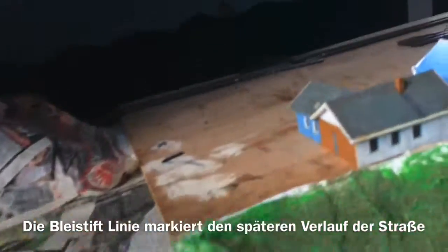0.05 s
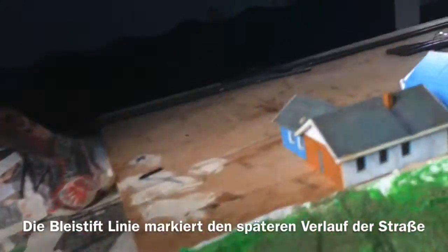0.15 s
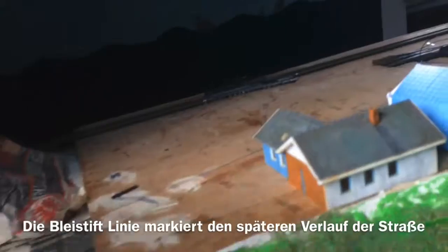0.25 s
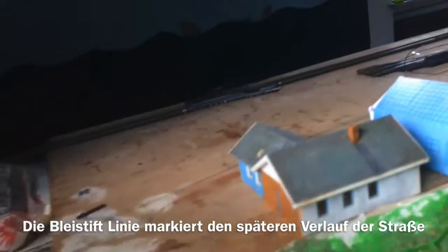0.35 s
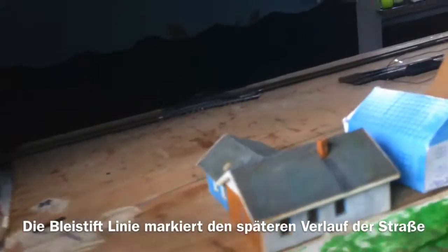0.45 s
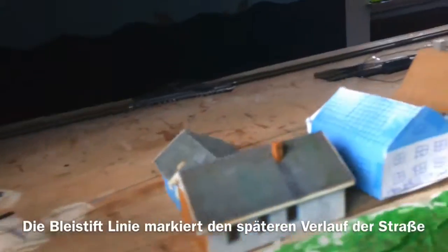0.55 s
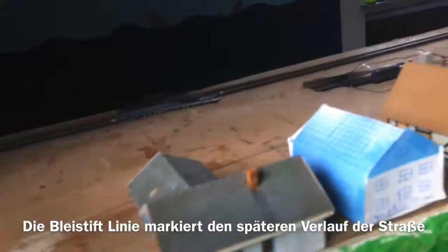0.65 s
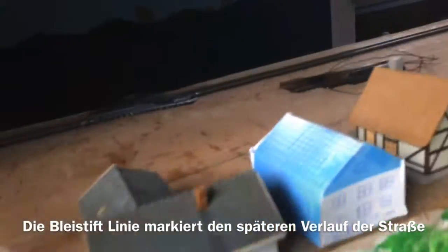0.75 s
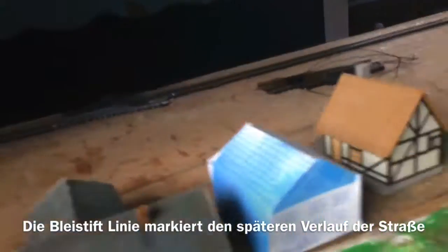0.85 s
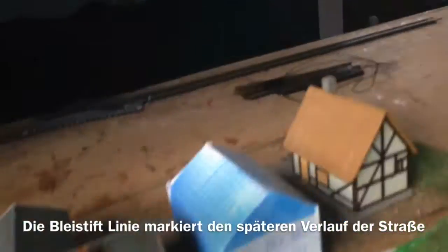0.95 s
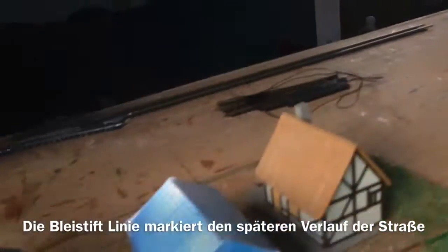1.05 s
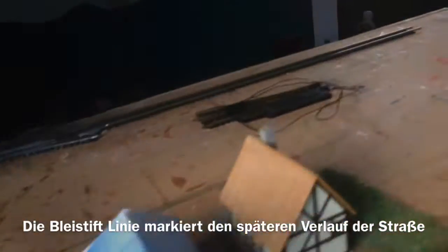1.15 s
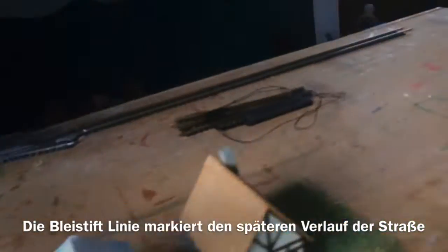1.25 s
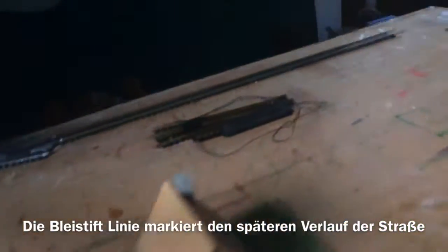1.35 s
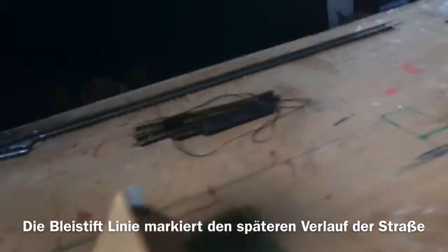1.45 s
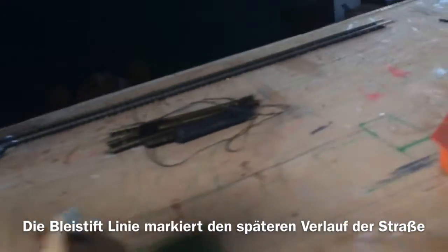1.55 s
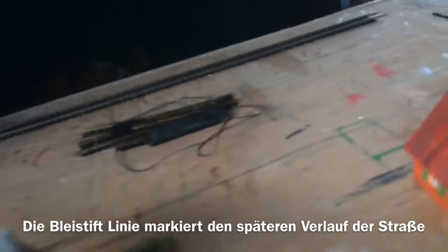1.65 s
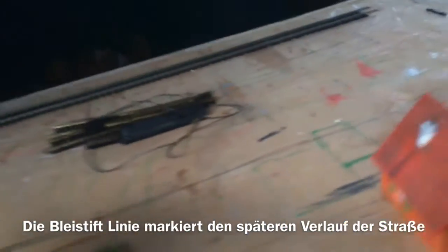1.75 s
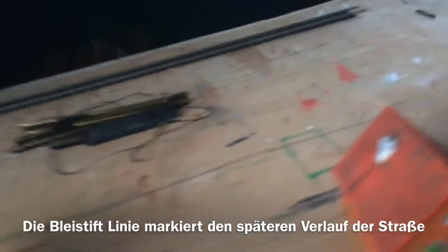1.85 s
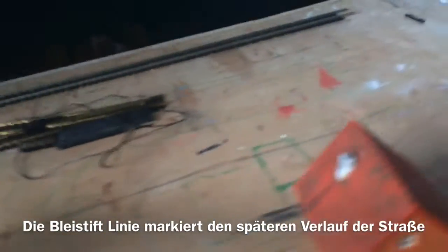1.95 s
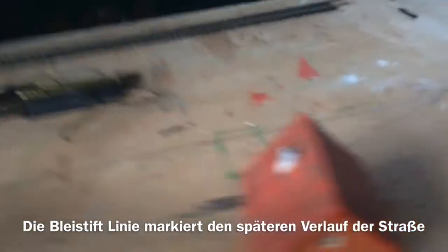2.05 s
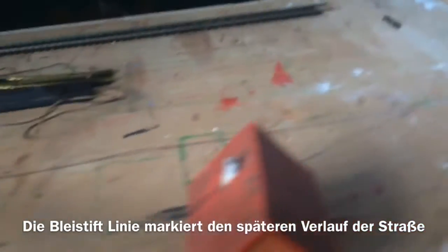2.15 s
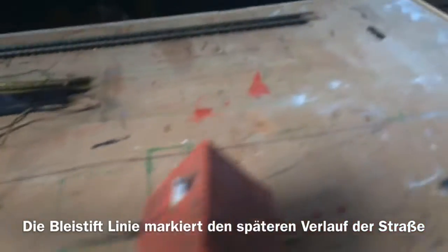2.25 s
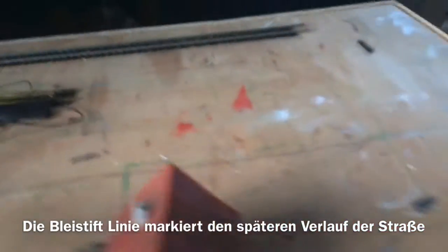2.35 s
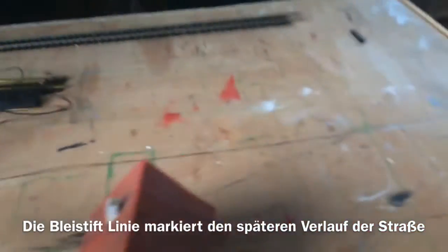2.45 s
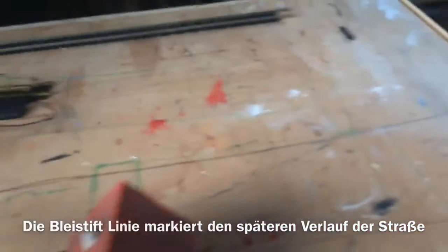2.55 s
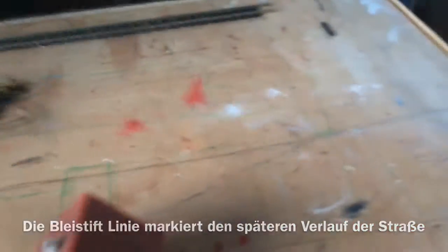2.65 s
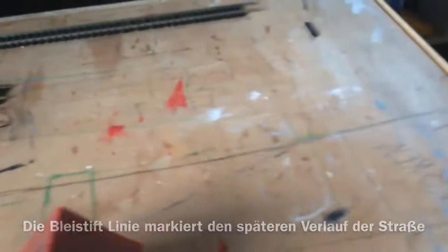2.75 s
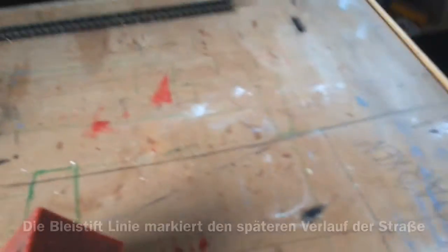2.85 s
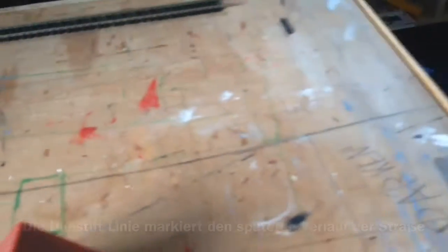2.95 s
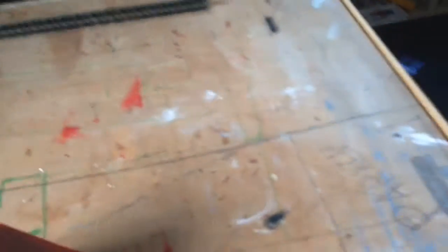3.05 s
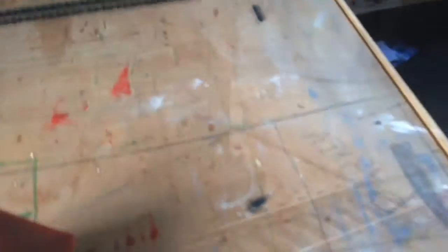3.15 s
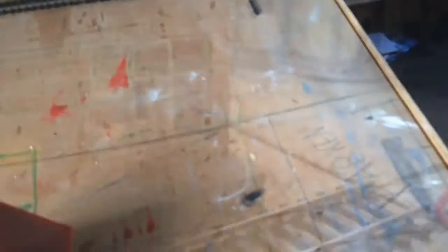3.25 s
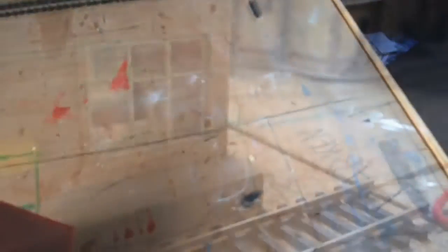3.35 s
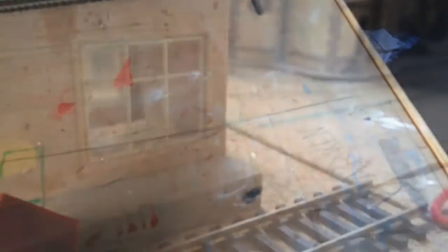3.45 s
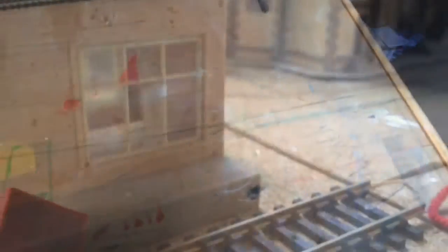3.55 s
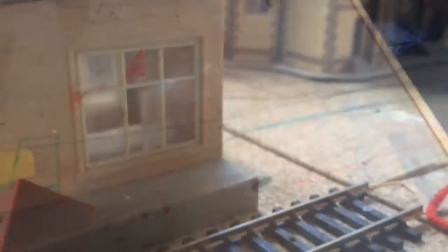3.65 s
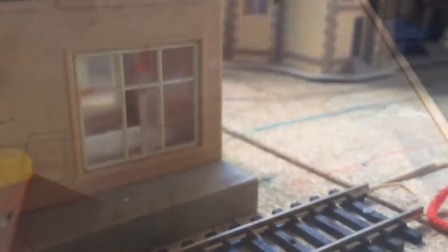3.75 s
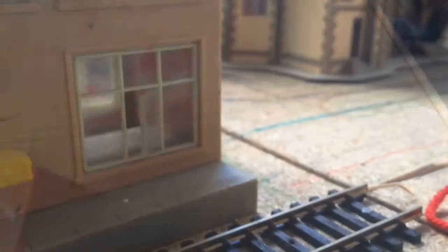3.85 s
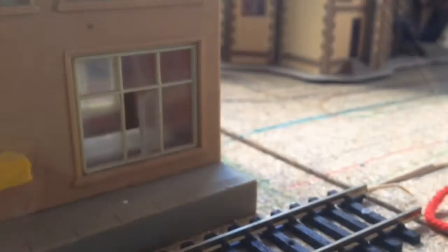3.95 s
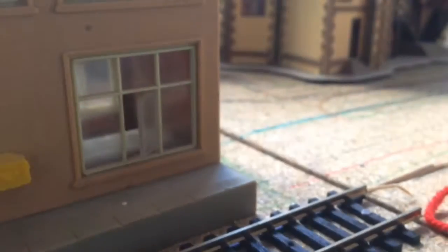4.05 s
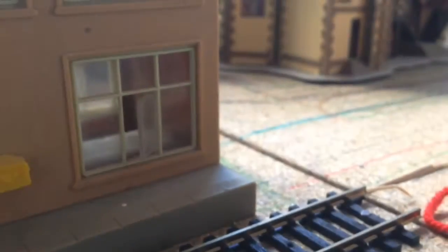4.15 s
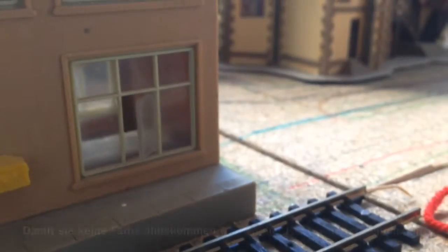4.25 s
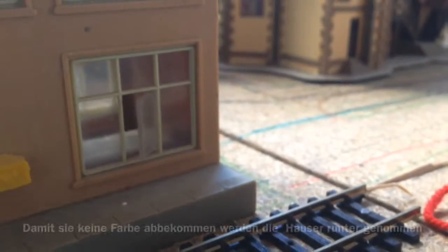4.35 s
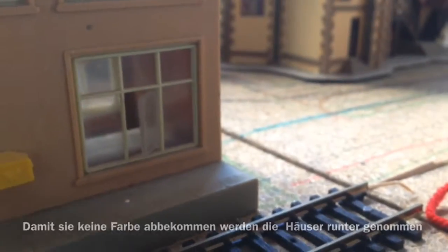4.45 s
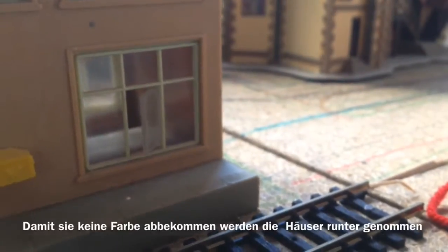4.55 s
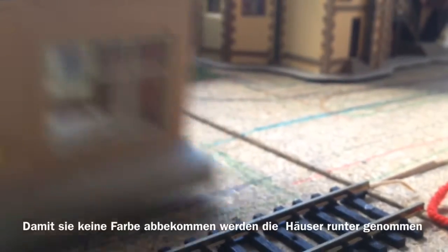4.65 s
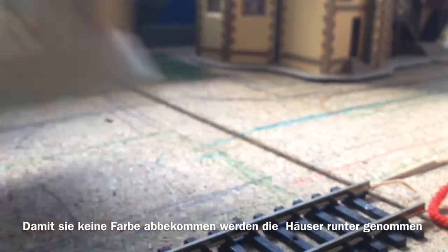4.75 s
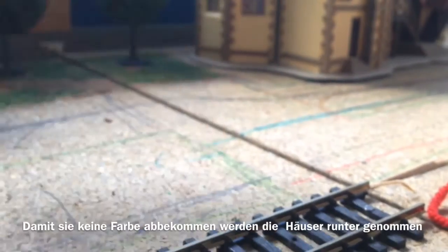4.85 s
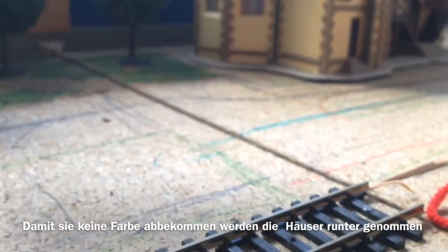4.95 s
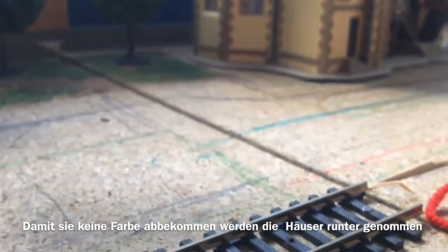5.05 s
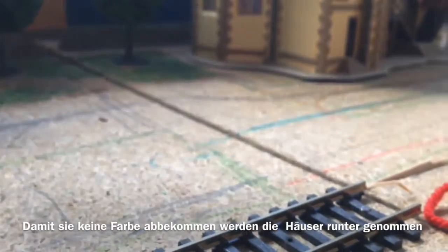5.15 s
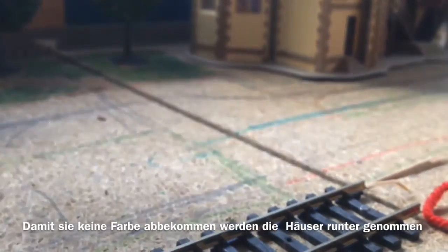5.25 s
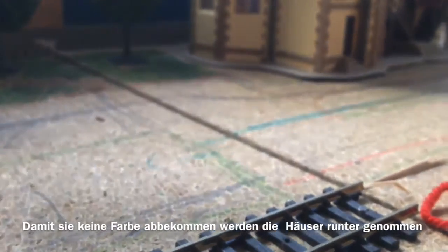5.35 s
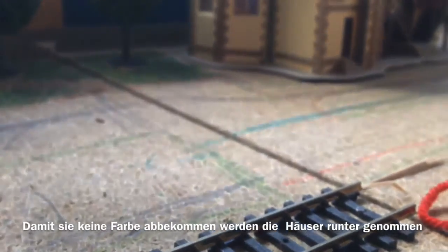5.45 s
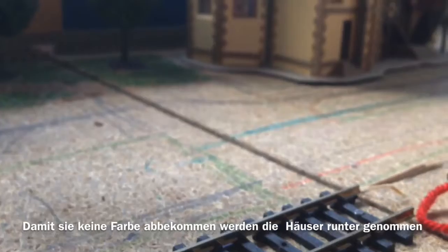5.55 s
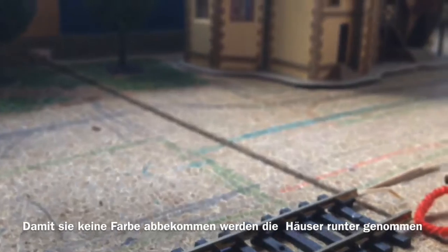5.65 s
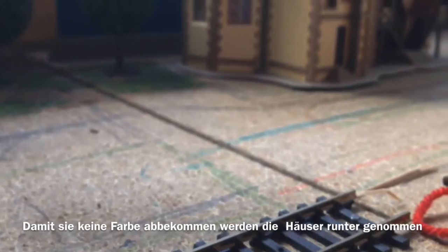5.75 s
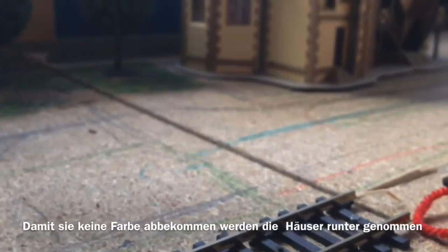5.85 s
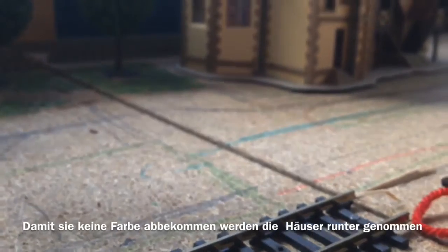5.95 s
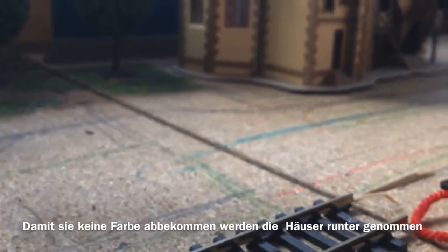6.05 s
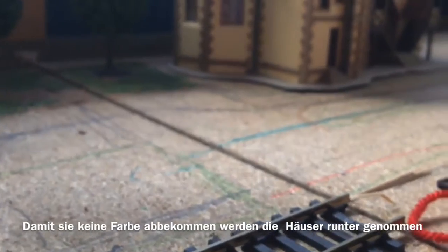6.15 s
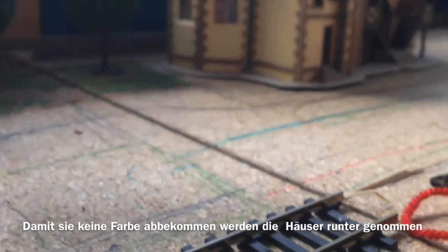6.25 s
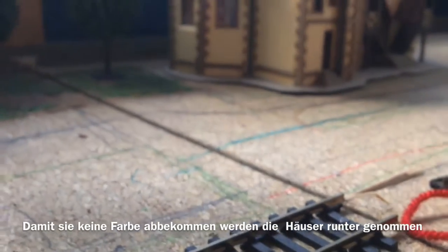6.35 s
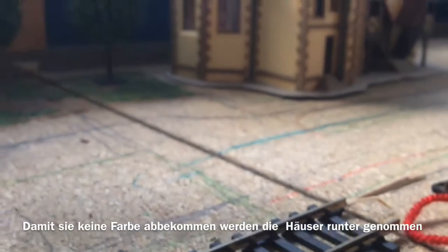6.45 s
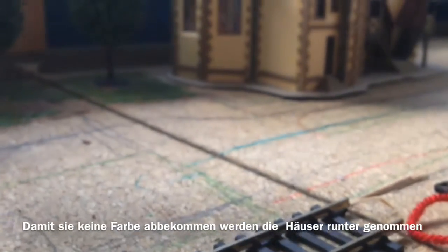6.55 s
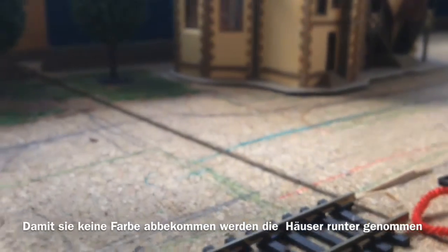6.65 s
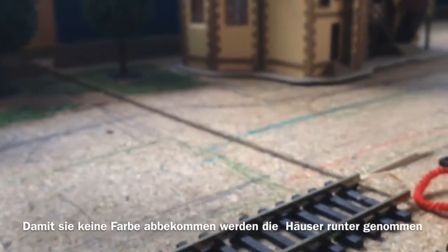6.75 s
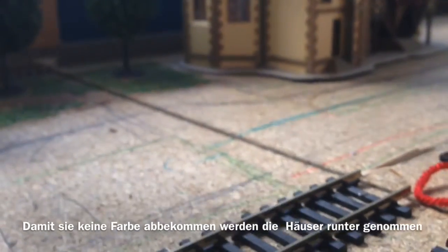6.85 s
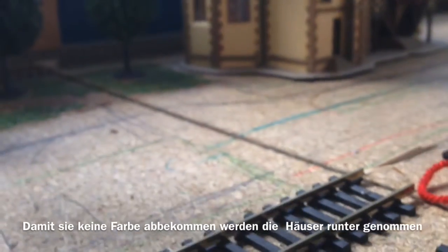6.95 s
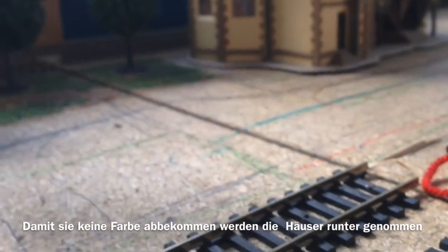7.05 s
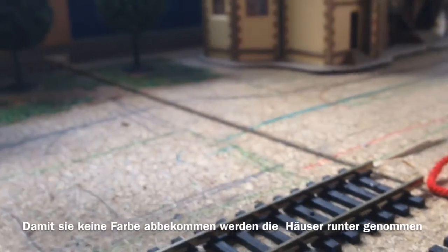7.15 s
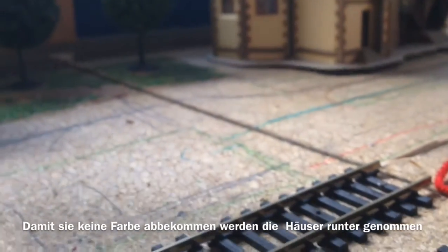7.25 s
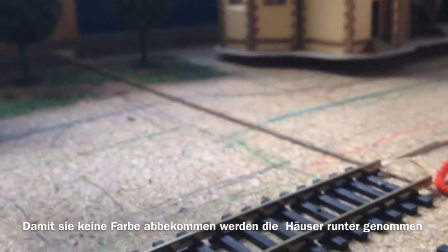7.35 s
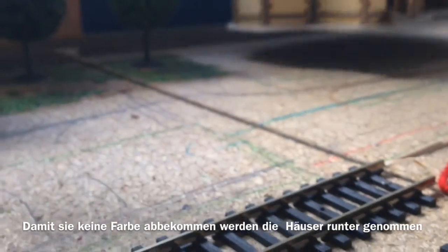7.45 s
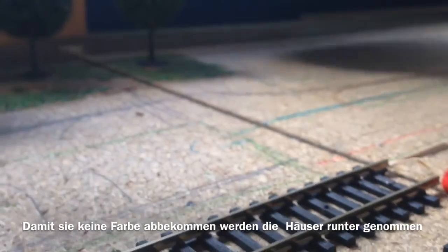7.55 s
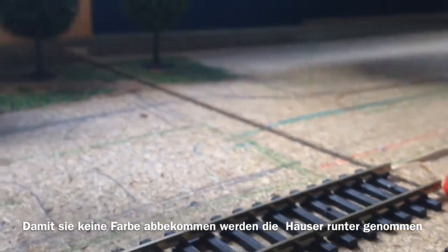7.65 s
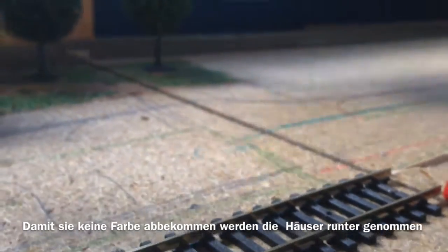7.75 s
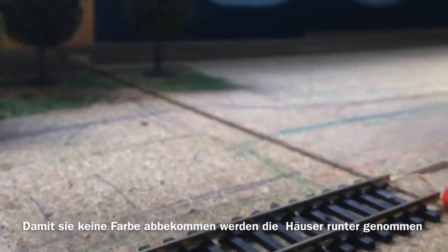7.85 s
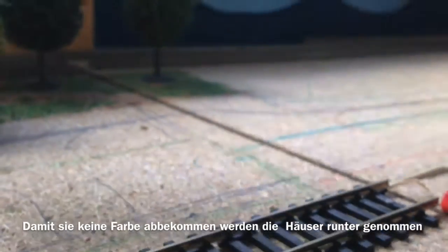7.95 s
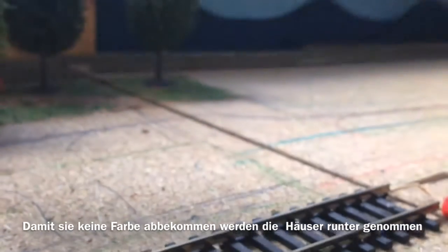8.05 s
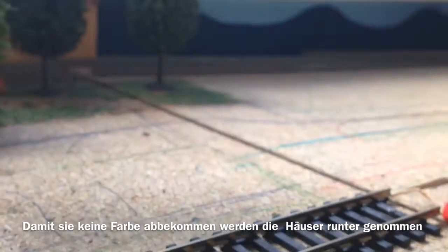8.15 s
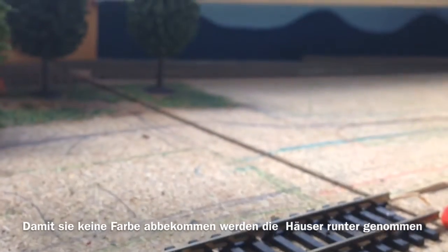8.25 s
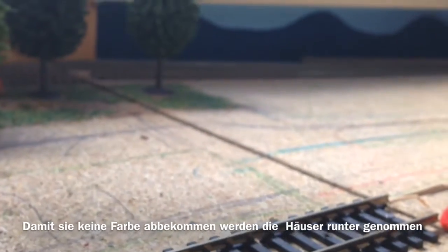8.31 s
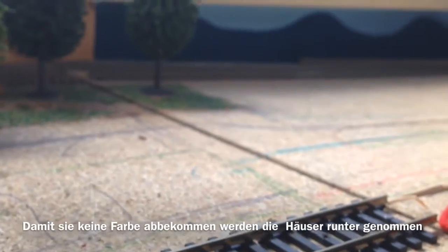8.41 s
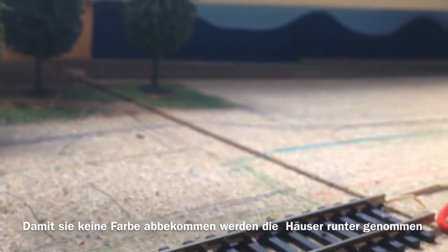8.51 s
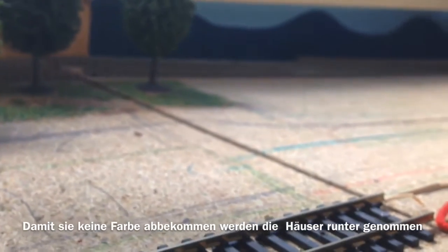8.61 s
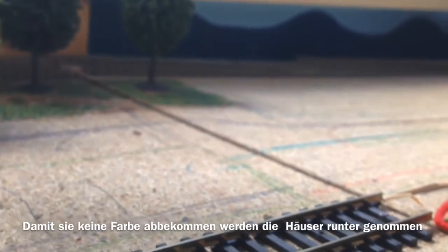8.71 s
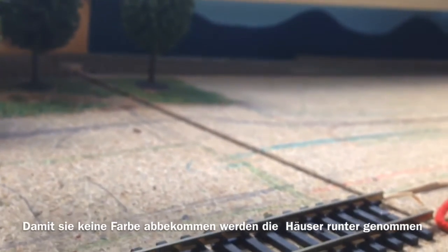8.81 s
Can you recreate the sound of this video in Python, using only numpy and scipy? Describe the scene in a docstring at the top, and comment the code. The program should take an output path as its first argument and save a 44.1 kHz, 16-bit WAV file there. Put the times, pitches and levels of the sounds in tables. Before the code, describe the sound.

Soft microphone hiss and a low hum fill a small quiet room throughout. For the first three seconds, fingers rustle faintly on a handheld camera and its plastic case creaks and ticks, most busily from 0.5 to 1.1 seconds. A thin, distant click comes at 1.4 seconds, and a small plastic part is tapped around 3.3. From 4.2 seconds a model house scrapes over cork with light knocks, building to a quick clatter near 4.8. Two sharper hollow knocks follow at 5.6 and 5.7, trailed by weaker ones. Between 6.6 and 7.5 seconds come soft, gritty drags with faint bumps, ending in a tiny, very faint squeak as a house lifts off. After a second of only hiss and hum, a house is set down hard on wood at 8.6 seconds: one sharp clack, by far the loudest sound, with a short room echo.

```python
"""Model houses on a hobby board

In a small quiet room, the plastic case of a handheld camera rustles, creaks and ticks under the fingers;
a far part clicks and a small one is tapped. Then model houses are knocked, slid over cork, lifted with a
squeak and set down hard on wood. Each blow is a rough contact that cracks and rings damped modes;
rubbing is stick-slip noise. Microphone hiss and a low room hum lie under it all."""
import sys
import numpy as np
from scipy import signal
from scipy.fft import rfft, irfft
from scipy.io import wavfile
from scipy.ndimage import uniform_filter1d

SR = 44100
rng = np.random.default_rng(int(sys.argv[2]) if len(sys.argv) > 2 else 0)


def wav_record(signal):
    """Record a signal, one row per channel, as 16-bit PCM in the file named by sys.argv[1]."""
    frames = np.transpose(np.atleast_2d(signal))
    bounded = np.clip(frames, -1, 1)
    # unit amplitude maps onto the largest positive 16-bit level
    quanta = np.round(bounded * 32767).astype(np.int16)
    wavfile.write(sys.argv[1], SR, quanta)


N = 391608

# hiss and hum spectrum: f/Hz, relative density/dB
HISS_SPECTRUM = [(12, -57), (20, -8), (103, -3), (153, -2), (213, -2), (245, -3.5), (362, -8), (393, -6),
                 (452, -7.5), (491, -8.5), (1070, -17.5), (3540, -13.5), (13500, -15.5), (15500, -16)]
# hiss dip between case and houses: t/s, gain/dB
HISS_DIP = [(0, -0.5), (3.2, -2), (3.7, -4.5), (4.2, -1.5), (8.88, -0.5)]
# room tail: f/Hz, t60/s, relative level/dB
ROOM_DECAY = [(100, 0.43, -4), (400, 0.34, 1.5), (1000, 0.29, 0.5), (4000, 0.34, 1), (12000, 0.22, -0.5)]

# finger rustle: t/s, level/dB
GRIP_LEVELS = [(0.0, -80), (0.05, -73), (0.32, -66), (0.62, -71), (0.72, -77.5), (0.9, -67), (1.02, -75),
               (1.11, -71), (1.28, -76), (1.41, -66), (1.54, -75.5), (1.9, -68.5), (1.98, -75), (2.5, -77),
               (2.75, -68), (2.85, -75), (3.19, -93), (3.31, -66), (3.37, -75), (3.7, -88)]
# hand jolts: t/s, level/dB
HAND_JOLTS = [(.92, -74), (1.11, -86), (1.62, -78), (2.1, -74), (2.75, -63), (3.31, -82), (3.41, -63)]
# squeezed case: t/s, hold/s, level/dB, upper band re level/dB
CASE_CREAKS = [(.52, .005, -69.5, 8), (0.573, .005, -66, -2), (0.764, 0.014, -54, -26),
               (1.062, 0.037, -63.5, -14), (1.306, 0.1, -77.5, -5), (2.066, 0.06, -69, -12),
               (2.65, 0.037, -71, -12), (2.74, 0.0087, -59, -17), (3.3, 0.033, -57, -3.5),
               (3.396, 0.085, -65.5, -4.5)]
# one list per drag: t/s, level/dB, board rumble re level/dB
DRAGS = [
    [(4.17, -100, 8), (4.206, -66, 7), (4.228, -81, 12), (4.272, -64.5, 5), (4.344, -88, 19),
     (4.366, -62, 5), (4.42, -91, 5)],
    [(4.46, -77, 2), (4.49, -64.5, 2), (4.562, -68.5, 4), (4.655, -73, 2), (4.667, -55.5, -10),
     (4.72, -39.5, -22), (4.76, -53.5, -6), (4.785, -68, -7)],
    [(6.58, -67, -5), (6.636, -71, 1), (6.726, -56, -18), (6.76, -56.5, -4), (6.842, -54, 2.5),
     (6.908, -66, 4), (6.95, -100, 5)],
    [(6.96, -99, -9), (6.978, -56, -20), (7.048, -75, -4), (7.1, -54.5, -13), (7.114, -46.5, 6.5),
     (7.186, -50, -6), (7.216, -52, -2.5), (7.308, -77, 8), (7.328, -56.5, -2), (7.454, -76.5, 3),
     (7.47, -74, -10)],
]
# per drag, re its level: scrape/dB, fizz/dB
DRAG_COLOURS = [(-6, -7), (-8.5, -13.5), (-11, -13), (-2, -7)]

# modes of each body: f/Hz, relative level/dB, t60/s
FAR_MODES = [(2150, -2, .03), (2450, -2, .03), (2700, 0, .04), (3600, 0, .02), (4300, 0, .02),
             (5300, -2, .015), (7000, 0, .008), (9500, -3, .006)]
TAP_MODES = [(230, 0, .05), (600, 0, .03), (1000, 0, .02), (1900, -2, .012), (4050, 0, .09),
             (5450, 2, .025), (7000, 0, .005)]
CASE_MODES = [(230, 0, .05), (560, 0, .03), (1400, 0, .015), (1850, -2, .012), (3250, 0, .012),
              (4100, -4, .014), (5300, -3, .006), (7800, 0, .003), (10500, -3, .002)]
HOUSE_MODES = [(95, -19, 0.051), (131, -23, 0.047), (167, 1.5, 0.09), (219.4, 2.5, 0.087), (257, -1, 0.071),
               (358, -3, 0.087), (486, 3.5, 0.079), (610, -0.5, 0.057), (750, -3, 0.11), (984, 2.5, 0.11),
               (1118, 3.5, 0.11), (1462, -4, 0.046), (1740, -4.5, 0.11), (1853, -6, 0.082),
               (2100, -4.5, .04), (2560, -19, 0.02), (3297, -4.5, 0.039), (3670, -5, 0.024),
               (4240, 0, 0.028), (4620, 9.5, 0.02), (5440, 1, 0.023), (6890, 3, 0.012), (8300, 0, 0.0086)]
SET_DOWN_MODES = [(88, -10, 0.16), (161, 0, 0.16), (222, -0.5, .1), (388, -7, 0.069), (494, 1, 0.071),
                  (621, 1, 0.088), (805, -8, .04), (976, 1, 0.062), (1178, 5, .06), (1310, -7, 0.046),
                  (1542, -3, .05), (1762, -4, 0.036), (1898, 1, 0.063), (2051, -3, 0.062),
                  (2174, -3, 0.053), (2450, -11, 0.016), (3365, -3, 0.013), (3630, 2, 0.017),
                  (4520, 0, 0.015), (5655, -1, 0.014), (6600, 1, 0.0065), (8040, 1.5, 0.013)]
# band edges of the blows
FAR_EDGES_HZ, CASE_EDGES_HZ = (2000, 3000, 6000, 12000), (130, 350, 800, 2500, 6000, 13000)
HOUSE_EDGES_HZ = (68, 300, 700, 1400, 2900, 5200, 12500)
SET_DOWN_EDGES_HZ = (68, 430, 700, 1400, 2900, 5200, 12500)

# blows: t/s, level/dB, peak per band re level/dB (low to high), contact/ms, room send/dB
FAR_BLOWS = [(1.375, -35, -3.5, -15, -17, 6.8, -1.8), (1.383, -36, -29, -5, -6, 19, 0.66)]
TAP_BLOWS = [(3.2825, -33.5, -11.5, -14, -11, -11, -17, 6.2, -10),
             (3.3252, -42, -4.5, -23, -14, -2.5, -18, 1.4, -11),
             (3.3962, -50, -6, -10, -5.5, -7, -15, 2.1, -22)]
SET_DOWN_BLOWS = [(8.587, -6, -37, -13, -9, -12, -39, -12, 17.5, -11),
                  (8.59, -5.5, -22.5, -22.5, -13.5, -9.5, -9.5, -11, 14.4, -5)]
# case ticks: t/s, level/dB, thud and knock re level/dB, contact/ms
TICKS = [(0.4812, -34, -18.5, -22, 3.2), (0.5301, -44, -18, -10, 2.2), (0.5745, -28, -24, -25, 9.3),
         (0.591, -26, -31, -21.5, 6.2), (0.7616, -34.5, -9, -14, 7.3), (0.7972, -26.5, -19, -17.5, 1.7),
         (0.884, -27.5, -36, -17, 1.9), (0.8981, -25.5, -23.5, -22, 2), (0.9478, -28, -45, -17, 4.2),
         (1.113, -37, -17, -7.5, 9), (1.1247, -28.5, -25, -19.5, 4.7), (1.3331, -45.5, -9, -8, 1.4),
         (2.098, -38.5, -29, -12, 8.4), (2.6885, -51, -2, -13, 1.6), (2.719, -51, -14, -10, 2.3),
         (2.7381, -42.5, -10, -6, 4.2), (2.7616, -48, -24, -7, 2.2)]
# house knocks: t/s, wall level/dB, board, hollow, roof and edge re wall/dB, contact/ms, room send/dB
KNOCKS = [(4.2009, -52.5, -.5, -18, -12, -0.5, 4.3, -22), (4.2744, -55.5, 7, 2, -6, -13, 4.5, -24),
          (4.366, -47.5, -9, -22, -7, -4.5, 4.2, -13), (4.4826, -53, 0.5, -18, -7, 2, 7.6, -0.5),
          (4.6025, -50, -0.5, -6, 2.5, -6, 5.1, -8.5), (4.6672, -41, -18, -5, -23, -12, 7.2, -3),
          (4.7116, -30.5, -30, -2.5, -8.5, -7, 7.5, -10), (4.732, -42, -14, -20, -10, -11, 7.6, -14),
          (4.791, -23, -17.5, 0.5, -22, -3, 7.5, -10), (4.81, -25, -21.5, -4, -11, -6, 5.5, -9),
          (4.8447, -22.5, -15, -15, -6.5, -3, 6.4, -35), (5.5689, -25.5, -24, -24, 1, -5.5, 7.8, -2),
          (5.6725, -21.5, 6.5, -1, -1, -5.5, 5.1, -5.5), (5.7798, -39.5, 3, -.5, -0.5, -5, 6.5, -4),
          (5.8248, -45, -5, -18, -1.5, -10.5, 4.5, -4), (5.886, -55.5, -2, -1, 6, 10.5, 7.5, -3),
          (6.8128, -65, 19, 20.5, -6, -3, 5.5, -15), (6.8357, -63.5, 19, 20.5, 8.5, 0, 6.5, -15),
          (7.051, -63, 6, 9, 11, -3, 4.5, -2), (7.0689, -59, 14.5, 2, 7, 4, 4.4, -9),
          (7.0938, -51.5, 7, 10.5, 15, 8.5, 3.7, 1), (7.3216, -69, -9, 14, -12, -9, 5, -10)]


def undb(db):
    """dB to gain."""
    return 10 ** (np.asarray(db) / 20)


def unit(x):
    """Scale to rms 1."""
    return x / np.sqrt(np.mean(x ** 2))


def band(x, lo_hz, hi_hz):
    """Butterworth band-pass."""
    return signal.sosfilt(signal.butter(3, [lo_hz, hi_hz], "band", fs=SR, output="sos"), x)


def curve(rows):
    """Interpolate dB columns over time; -120 dB outside the table."""
    times_s, *columns = np.transpose(rows)
    return [np.interp(np.arange(N) / SR, times_s, db, left=-120, right=-120) for db in columns]


def walk(rate_hz):
    """Random steps, smoothed twice, rms 1."""
    hold = int(SR / rate_hz)
    steps = np.repeat(rng.standard_normal(N // hold + 1), hold)
    return unit(uniform_filter1d(uniform_filter1d(steps, hold), hold)[:N])


def swell(at_s, hold_s, db, rise_db_per_s, fall_db_per_s):
    """Gain that peaks at at_s, holds and falls."""
    t = np.arange(N) / SR - at_s
    return undb(db - rise_db_per_s * np.maximum(-t, 0) - fall_db_per_s * np.maximum(t - hold_s, 0))


def stick_slip(rate_hz, spread_db, smooth_gain):
    """Random catches of uneven size over even rubbing."""
    catches = (rng.random(N) < rate_hz / SR) * rng.standard_normal(N)
    catches *= undb(spread_db * rng.exponential(size=N))
    return unit(catches) + smooth_gain * rng.standard_normal(N)


def ring(modes, lo_hz, hi_hz):
    """Impulse response in one band; thin walls give each mode two weaker neighbours."""
    t = np.arange(SR // 10)[:, None] / SR
    hz, db, t60_s = np.tile(np.transpose([m for m in modes if lo_hz <= m[0] < hi_hz]), 3)
    neighbour = np.arange(len(hz)) >= len(hz) // 3
    hz = hz * (1 + np.where(neighbour, .03, .003) * rng.standard_normal(len(hz)))
    tones = np.sin(2 * np.pi * (hz * t + .2 * rng.random(len(hz)))) * np.exp(-np.log(1000) * t / t60_s)
    gains = undb(db - 1.96 * neighbour + 1.63 * rng.standard_normal(len(hz)))
    return tones @ gains * np.cos(np.pi / 2 * t[:, 0] / t[-1])


def blows(rows, modes, edges_hz, crack_db, rise_contacts, ring_send, snap):
    """Short rough contacts crack and ring the modes; returns [direct, room send]."""
    direct, send = np.zeros((2, N + SR))
    t = np.arange(SR // 10) / SR
    rows = np.array(rows)
    contact_s = rows[:, -2:-1] / 1000
    force = rng.standard_normal((len(rows), len(t))) * np.exp(-t / contact_s)
    force *= np.clip(0.64 + t / (0.19 * contact_s), 0, 1)  # a broad base lands gradually
    force[:, 0] = snap  # first touch of hard plastic
    attacks = 1 - np.exp(-t / (rise_contacts * contact_s))
    for k, (lo_hz, hi_hz) in enumerate(zip(edges_hz, edges_hz[1:])):
        for row, crack, attack in zip(rows, band(force, lo_hz, hi_hz), attacks):
            at_s, db, *bands_db, _, send_db = row
            body = ring(modes, lo_hz, hi_hz) * attack
            body /= abs(body).max()
            crack = undb(crack_db) * crack / abs(crack).max()
            gain = undb(db + bands_db[k]) / abs(body + crack).max()
            i = int(at_s * SR)
            direct[i:i + len(t)] += gain * (body + crack)
            send[i:i + len(t)] += gain * undb(send_db) * (ring_send * body + crack)
    return band(np.array([direct[:N], send[:N]]), 48, 18000)  # no deep bass radiated


def room(x):
    """Dense echoes that start after a few ms and lose their top first."""
    t = np.arange(SR * 3 // 5) / SR
    hz, t60_s, db = np.transpose(ROOM_DECAY)
    tail = 0
    for centre_hz in 60 * 2 ** np.arange(0, 8, .5):
        decay = np.exp(-np.log(1000) * t / np.interp(np.log(centre_hz), np.log(hz), t60_s))
        gain = undb(np.interp(np.log(centre_hz), np.log(hz), db))
        tail += gain * decay * band(rng.standard_normal(len(t)), centre_hz / 2 ** .25, centre_hz * 2 ** .25)
    tail *= np.clip(t / 0.0051 - .5, 0, 1)
    return signal.fftconvolve(x, tail / np.sqrt(np.sum(tail ** 2)))[:N]


def hiss(level_db=-63):
    """Microphone hiss over room hum; the bass wavers slightly."""
    bins_hz = np.maximum(np.arange(N // 2 + 1) * SR / N, 1)
    hz, db = np.transpose(HISS_SPECTRUM)
    shape = undb(np.interp(np.log(bins_hz), np.log(hz), db))
    noise = unit(irfft(rfft(rng.standard_normal(N)) * shape, N))
    waver = band(noise, 44, 660) * (undb(0.53 * walk(3.4)) - 1)
    return (noise + waver) * undb(level_db + curve(HISS_DIP)[0])


def grip(rumble_db=-94.5, rub_db=-10.5, flutter_db=1.5):
    """Fingers shift on the case: rumble, dull rubbing, creaks, thin rustle."""
    pressure = undb(curve(GRIP_LEVELS)[0] + flutter_db * walk(15))
    held = np.arange(N) / SR < GRIP_LEVELS[-1][0]
    jolts = sum(swell(at_s, 0, db, 154, 121) for at_s, db in HAND_JOLTS)
    rub = stick_slip(rate_hz=3000, spread_db=1.24, smooth_gain=1.0)
    low, high = unit(band(rub, 130, 460)), unit(band(rub, 460, 950))
    rumble = (undb(rumble_db) * held + jolts) * unit(band(rng.standard_normal(N), 36, 60.5))
    rubbing = undb(rub_db) * (low + 0.89 * high)
    rustle = unit(band(rub, 1280, 5800))
    creaks = sum(swell(at_s, hold_s, db, 609, 504) * (low + undb(high_db) * high)
                 for at_s, hold_s, db, high_db in CASE_CREAKS)
    return rumble + creaks + pressure * (rubbing + rustle)


def far_clicks():
    """A far part clicks twice: all treble, much room."""
    return blows(FAR_BLOWS, FAR_MODES, FAR_EDGES_HZ,
                 crack_db=-1.5, rise_contacts=0.42, ring_send=0.39, snap=1.4)


def taps():
    """A small plastic part is tapped and rings."""
    return blows(TAP_BLOWS, TAP_MODES, CASE_EDGES_HZ,
                 crack_db=2, rise_contacts=0.34, ring_send=0.45, snap=3)


def case_ticks(middling_db=-35, send_db=-19):
    """The plastic case ticks; stronger ticks shift weight to the top band."""
    rows = []
    for at_s, db, thud_db, knock_db, contact_ms in TICKS:
        upper_db = np.array([-15, -8.5, -9.5]) + np.array([-0.33, -0.37, 0.18]) * (db - middling_db)
        rows.append((at_s, db, thud_db, knock_db, *upper_db, contact_ms, send_db))
    return blows(rows, CASE_MODES, CASE_EDGES_HZ, crack_db=0.5, rise_contacts=.3, ring_send=.6, snap=6)


def squeak(start_s=7.44, end_s=7.485, pitch_hz=1350, peak_db=-67):
    """A base squeaks as it lifts off: one short, unsteady tone."""
    envelope = np.sin(np.pi * np.clip((np.arange(N) / SR - start_s) / (end_s - start_s), 0, 1))
    hz = pitch_hz * (1 + 0.0104 * walk(80))
    return undb(peak_db) * envelope * np.sin(2 * np.pi * np.cumsum(hz) / SR)


def house_slides(middling_db=-55):
    """A base drags over cork: catches ring house and board, grit fizzes on top."""
    rub = stick_slip(rate_hz=4000, spread_db=1.5, smooth_gain=.7) * undb(1.5 * walk(90))

    def resonance(lo_hz, hi_hz):
        return unit(signal.fftconvolve(rub, ring(HOUSE_MODES, lo_hz, hi_hz))[:N])

    board = unit(1.1 * resonance(60, 300) + unit(band(rub, 67, 292)))
    walls = unit(.5 * resonance(300, 1100) + unit(band(rub, 360, 906)))
    scrape = unit(0.38 * resonance(1100, 2300) + unit(band(rub, 1060, 1990)))
    fizz = unit(unit(band(rub, 2400, 4700)) + 0.5 * unit(band(rub, 6000, 9800)))
    out = 0
    for rows, (scrape_db, fizz_db) in zip(DRAGS, DRAG_COLOURS):
        db, board_db = curve(rows)
        fizz_gain = undb(fizz_db - 0.25 * np.maximum(db - middling_db, -20))  # grows less than the drag
        out += undb(db) * (walls + undb(board_db) * board + undb(scrape_db) * scrape + fizz_gain * fizz)
    return out


def house_knocks(instant_top_db=19.5, dulling_db_per_ms=4.5):
    """Houses knock on the board; a longer, softer contact is duller."""
    rows = []
    for at_s, db, board_db, hollow_db, roof_db, edge_db, contact_ms, send_db in KNOCKS:
        top_db = edge_db + instant_top_db - dulling_db_per_ms * contact_ms
        rows.append((at_s, db, board_db, hollow_db, 0, roof_db, edge_db, top_db, contact_ms, send_db))
    return blows(rows, HOUSE_MODES, HOUSE_EDGES_HZ,
                 crack_db=3.0, rise_contacts=0.4, ring_send=0.4, snap=0.93)


def house_set_down():
    """A house lands hard on wood: two contacts 3 ms apart."""
    return blows(SET_DOWN_BLOWS, SET_DOWN_MODES, SET_DOWN_EDGES_HZ,
                 crack_db=-1.0, rise_contacts=0.84, ring_send=0.38, snap=0.57)


def scene(slide_send_db=-17):
    """All sources and the room at one microphone."""
    direct, send = case_ticks() + house_knocks() + taps() + far_clicks() + house_set_down()
    sliding = house_slides() + squeak()
    echoes = room(send + undb(slide_send_db) * sliding)
    return (direct + sliding + echoes + grip() + hiss())[None]


def record(dry):
    """Steep low-pass at 15450 Hz."""
    return signal.sosfilt(signal.ellip(10, .2, 70, 15450, fs=SR, output="sos"), dry)


dry = scene()
out = record(dry)
wav_record(out)
```